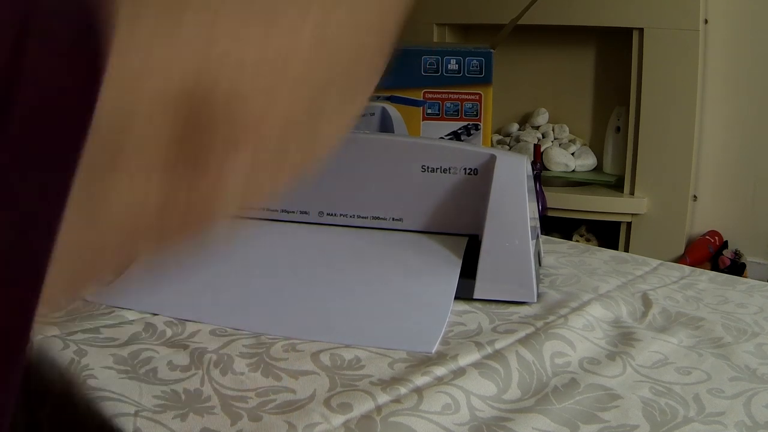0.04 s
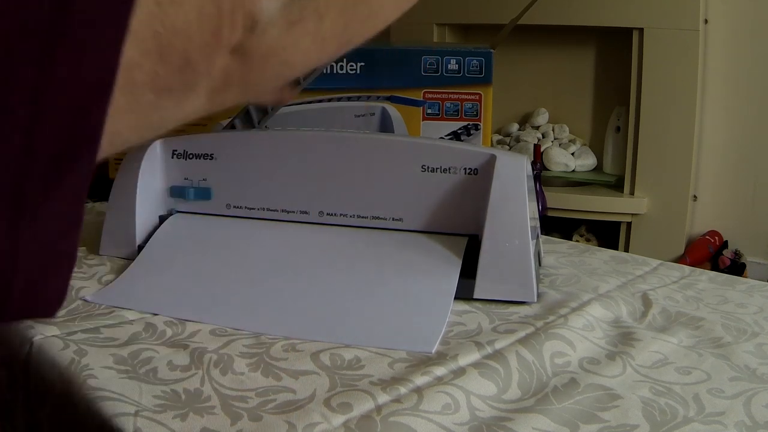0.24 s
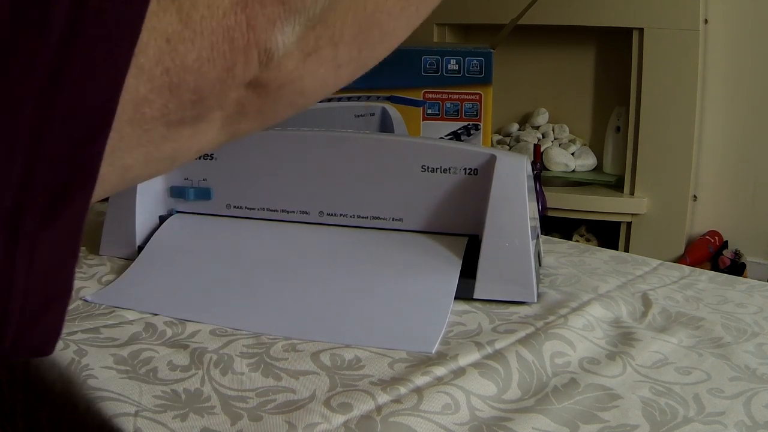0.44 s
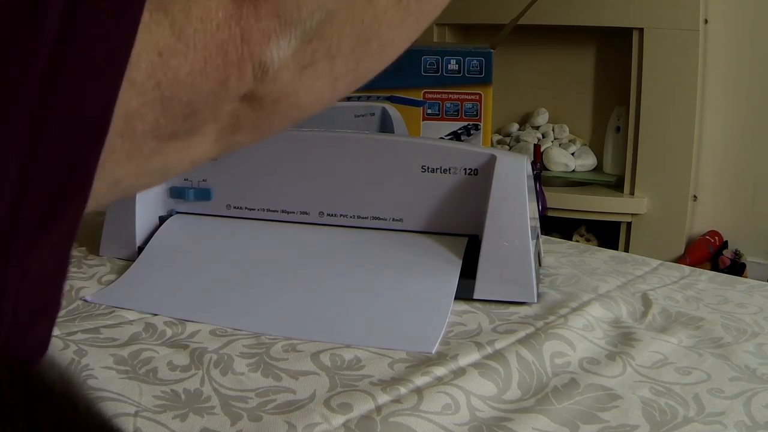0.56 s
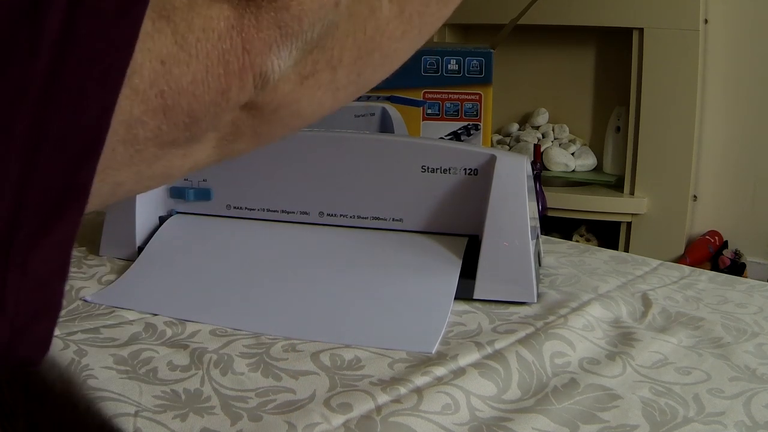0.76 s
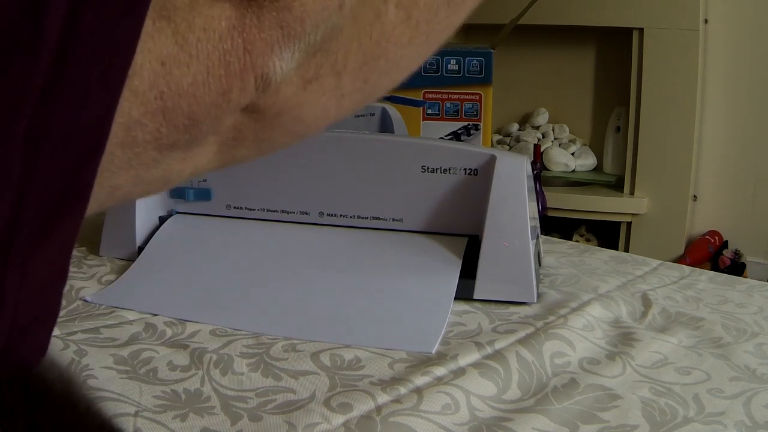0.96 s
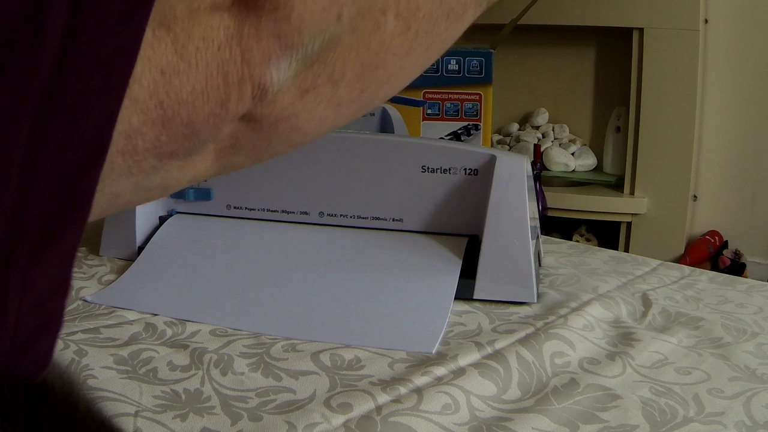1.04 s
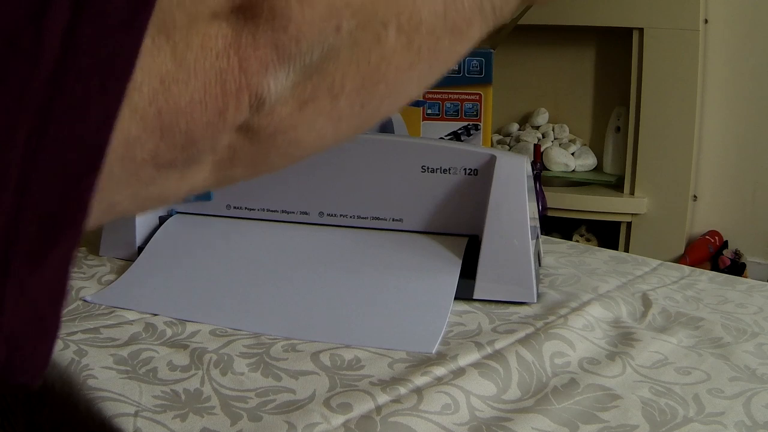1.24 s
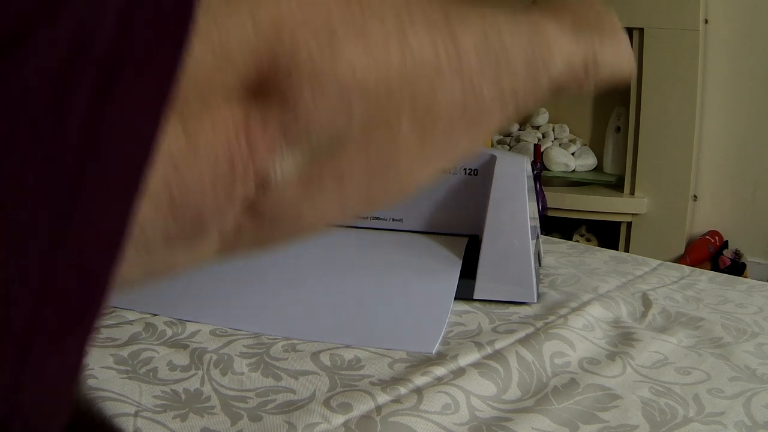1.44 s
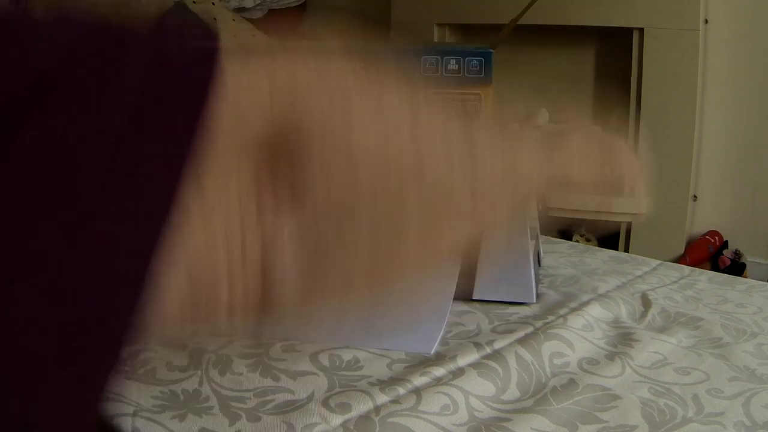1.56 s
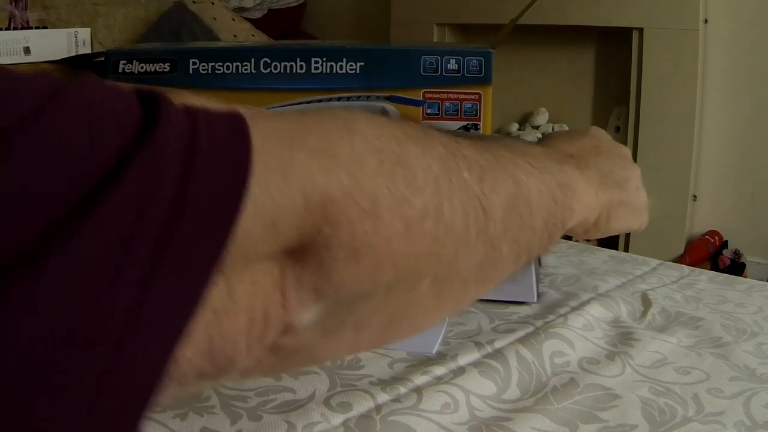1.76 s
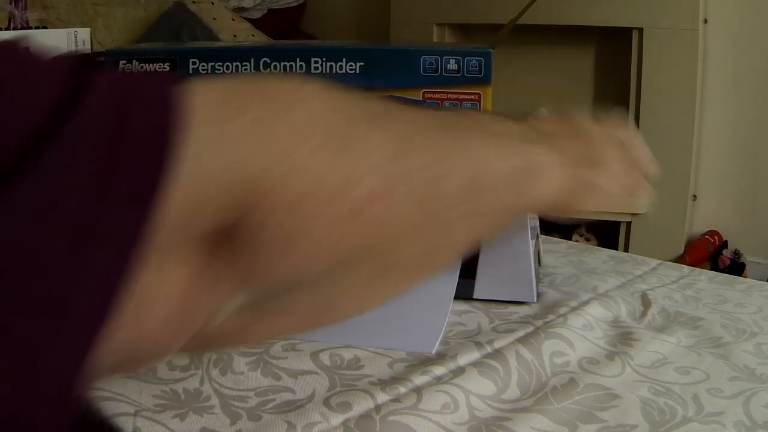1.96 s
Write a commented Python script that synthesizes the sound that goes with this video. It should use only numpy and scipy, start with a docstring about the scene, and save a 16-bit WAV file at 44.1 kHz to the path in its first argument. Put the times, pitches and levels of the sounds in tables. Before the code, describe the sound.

Paper-punching binder worked by hand: faint ticks, then a crunching run of plastic clunks and thunks.

```python
"""A plastic paper-punching binder is worked by its lever on a cloth-covered table in a small room.
The lever clunks into place and steel pins crunch through the sheets group after group: noise bursts
strike the modes of the case, over a bed of crackling grind. The linkage ticks under the grip before,
and the lever ticks back after, as short resonant puffs. A faint spring rings, the table sways in
deep sine swells, and a room tail and steady hiss surround it all."""
import sys
import numpy as np
from scipy import signal
from scipy.fft import rfft, irfft
from scipy.io import wavfile
from scipy.ndimage import uniform_filter1d

SR = 44100
rng = np.random.default_rng(int(sys.argv[2]) if len(sys.argv) > 2 else 0)


def put_to_file(sound):
    """Save the sound as 16-bit audio at rate SR, in the file named by the first command-line argument."""
    columns = np.atleast_2d(sound).T  # one column per channel
    safe = np.clip(columns, -1, 1)
    whole_steps = np.round(safe * 32767)
    wavfile.write(sys.argv[1], SR, whole_steps.astype(np.int16))


N = 88508  # samples in the scene


def amp(db):
    """Gain for a level in dB."""
    return 10 ** (np.asarray(db) / 20)


def to_rms_one(x):
    """Scale to an RMS of 1."""
    return x / np.sqrt(np.mean(x ** 2) + 1e-20)


def to_energy_one(x):
    """Scale so that the squared samples sum to 1."""
    return x / np.linalg.norm(x)


def read_curve(points, hz):
    """Read a curve of (Hz, value) points along a log frequency axis."""
    point_hz, value = np.transpose(points)
    return np.interp(np.log(hz + 1), np.log(point_hz + 1), value)


def add(mix, start, sound):
    """Lay a sound into the mix at a start in seconds, cut at the end of the mix."""
    part = mix[round(start * SR):][:len(sound)]
    part += sound[:len(part)]


def resonate(x, hz, width):
    """A resonance of gain 1: shift its pitch down to 0 Hz, smooth with one pole, shift back."""
    turn = np.exp(2j * np.pi * hz * np.arange(len(x)) / SR)
    pole = np.exp(-np.pi * width / SR)
    return 2 * (turn * signal.lfilter([1 - pole], [1, -pole], x / turn)).real


def split(x, hz, kind):
    """Keep the low or high side of a second-order crossover."""
    return signal.sosfilt(signal.butter(2, hz, kind, fs=SR, output="sos"), x)


def rattle(noise, t, length):
    """A dying noise burst whose broad spectrum is levelled, so that every blow drives all modes."""
    attack = np.minimum(t / 0.00057, 1)
    spectrum = rfft(noise * np.exp(-t / length) * attack)
    reach = max(int(t[-1] / length / 2), 1)  # smoothing width in spectrum bins
    broad_power = uniform_filter1d(abs(spectrum) ** 2, reach)
    levelled = irfft(spectrum / np.sqrt(broad_power), len(t))
    return levelled * np.exp(-t / (3 * length))


# Colour of the hiss. Each row: frequency in Hz, relative level in dB.
AIR_COLOUR = [(20, 6), (720, -19), (8080, -32.5), (15300, -43)]
AIR_DB = -58  # RMS level


def air():
    """Steady room and microphone hiss: noise shaped in the spectrum."""
    hz = np.fft.rfftfreq(N, 1 / SR)
    spectrum = rfft(rng.standard_normal(N)) * amp(read_curve(AIR_COLOUR, hz))
    return amp(AIR_DB) * to_rms_one(irfft(spectrum, N))


# How long the room holds each band. Each row: frequency in Hz, time to fall by 60 dB in seconds.
ROOM_DECAY = [(500, 0.19), (2000, 0.14), (6000, 0.21)]
ROOM_DB = -4  # gain of the room against the dry binder


def room(x):
    """Three noise tails fed in turn, each band dying at its own speed."""
    hz, t, noise = signal.stft(rng.standard_normal((3, SR // 2)), SR, nperseg=256)
    decay = amp(-60 * t / read_curve(ROOM_DECAY, hz)[:, None])
    tails = signal.istft(noise * decay, SR, nperseg=256)[1]
    tails = np.pad(tails, ((0, 0), (130, 0))) / np.linalg.norm(tails[0])  # 130 samples of pre-delay
    phase = np.pi * (23 * np.arange(N) / SR + np.arange(3)[:, None] / 3)
    feeds = x * np.sqrt(2 / 3) * np.cos(phase)  # the three squared weights always sum to 1
    return signal.fftconvolve(feeds, tails, axes=1)[:, :N].sum(0)


# The table rocks. Each row: start in seconds, RMS level at the crest in dB, rise in seconds.
TABLE_SWAYS = [(0.644, -49, 0.042), (0.968, -37, 0.032), (1.008, -34, 0.032), (1.16, -46, 0.028),
               (1.37, -34, 0.066), (1.627, -25.5, 0.011), (1.697, -20.5, 0.039), (1.859, -35, 0.028)]
SWAY_HZ = 38.5


def sway():
    """Each push rocks the table on its legs at a deep pitch: a smooth swell that dies away."""
    out, t = np.zeros(N), np.arange(SR // 2) / SR
    tone = np.sqrt(2) * np.sin(2 * np.pi * SWAY_HZ * t)
    for start, db, rise in TABLE_SWAYS:
        swell = (t / rise * np.exp(1 - t / rise)) ** 2  # reaches 1 at the rise time
        add(out, start, amp(db) * swell * tone)
    return out


# The return spring rings. Each row: start in seconds, level in dB before the swell and decay.
SPRING_RINGS = [(0.316, -48), (0.496, -47.5)]
SPRING_HZ, SPRING_T60 = 292, 0.43  # pitch, seconds to fall by 60 dB


def spring():
    """The return spring gives a faint pure ring that swells in and dies away."""
    out, t = np.zeros(N), np.arange(SR // 2) / SR
    tone = np.sin(2 * np.pi * SPRING_HZ * t) * np.minimum(t / 0.0062, 1)
    for start, db in SPRING_RINGS:
        add(out, start, tone * amp(db - 60 * t / SPRING_T60))
    return out


# Modes of the plastic case. Each row: frequency in Hz, width in Hz, relative energy in dB.
CASE_MODES = [(147.5, 24, 11), (220.6, 17.5, -2.5), (293, 66, 8), (356.5, 24, 11), (579, 75, -3.5),
              (697, 160, -19), (1230, 130, -8.5), (1422, 69, -9.5), (3020, 420, -12), (5500, 230, -65.5)]
# What the case radiates between its modes. Each row: frequency in Hz, relative level in dB per Hz.
CASE_BROAD = [(60, 3), (141, -22.5), (199, -19.5), (260, -1), (491, -9), (695, -5), (3400, -28),
              (4100, -30), (7000, -35.5), (15000, -58.5)]
BROAD_DB = 0.5  # broad colour against the modes


def case_response():
    """What the case rings with after one click: its modes plus a broad causal colour, energy 1."""
    log_gain = np.log(amp(read_curve(CASE_BROAD, abs(np.fft.fftfreq(8192, 1 / SR)))))
    minimum_phase = -signal.hilbert(log_gain).imag
    broad = np.fft.ifft(np.exp(log_gain + 1j * minimum_phase)).real[:4096]
    t = np.arange(len(broad)) / SR
    modes = np.zeros(len(t))
    for k, (hz, width, db) in enumerate(CASE_MODES):
        ring = np.sqrt(width) * np.exp(-np.pi * width * t) * np.sin(2 * np.pi * hz * t)
        modes += (-1) ** k * amp(db) * ring  # neighbours in opposite sign
    return to_rms_one(to_rms_one(modes) + amp(BROAD_DB) * to_rms_one(broad)) / np.sqrt(len(t))


CASE_LOW_HZ, BASS_HZ, TREBLE_HZ = 104, 197.6, 1584  # low cut, bass/middle and middle/treble crossovers


def voiced(drive, response):
    """A drive through the case, split in bass, middle and treble."""
    x = split(signal.fftconvolve(drive, response), CASE_LOW_HZ, "high")
    low = split(x, BASS_HZ, "low")
    mid = -split(split(x, BASS_HZ, "high"), TREBLE_HZ, "low")  # opposite sign: no gaps at the joins
    return low, mid, split(x, TREBLE_HZ, "high")


# Grinding of lever and pins, joined by straight lines.
# Each row: time in seconds, body RMS level in dB, treble against the body in dB.
GRIND_COURSE = [(0, -59.5, 4.5), (0.199, -68, -2.5), (0.328, -56.5, 4), (0.438, -66, -6.5),
                (0.598, -56.5, 2.5), (0.741, -61.5, 0.5), (0.791, -77.5, 0), (0.829, -56, 4.5),
                (0.898, -71, 6), (0.998, -33, -9.5), (1.129, -46.5, -2), (1.242, -66, -5), (1.27, -40, 0.5),
                (1.39, -35, 3.5), (1.5, -31, 4), (1.569, -34.5, 0), (1.649, -30.5, 3.5), (1.718, -33, -7.5),
                (1.84, -53, -4.5), (1.899, -48, -16.5), (1.95, -61.5, 3), (2.0, -55, 8.5)]
GRIND_BASS_DB = 9.5  # bass boost within the body
GRAINS_PER_S, GRAIN_SPREAD_DB, GRAIN_S = 500, 3.0, .002  # mean rate, size spread, decay in seconds


def grind(response):
    """Overlapping uneven crackles of tearing paper and rubbing parts, heard through the case."""
    t = np.arange(N) / SR
    time, db, treble_db = np.transpose(GRIND_COURSE)
    size = amp(GRAIN_SPREAD_DB * np.minimum(rng.exponential(1, N), 4))
    grains = size * (rng.random(N) < GRAINS_PER_S / SR)
    crackle = signal.lfilter([1], [1, -np.exp(-1 / (GRAIN_S * SR))], grains)
    rubbing = (0.38 + crackle) * rng.standard_normal(N)  # steady rub under the grains
    low, mid, high = voiced(rubbing, response)
    body = to_rms_one((amp(GRIND_BASS_DB) * low + mid)[:N])
    treble = to_rms_one(high[:N])
    return amp(np.interp(t, time, db)) * (body + amp(np.interp(t, time, treble_db)) * treble)


# Pitches in Hz at which the steel parts of the linkage ring.
LINKAGE_HZ = [1447, 1910, 2386, 3150, 3810, 5110, 6640]
LINKAGE_WIDTH, LINKAGE_DB = 160, 7  # Hz, gain of each ring
# Linkage ticks. Each row: start in seconds, energy of the pitched part in dB, pitch in Hz,
# bright band against the pitched part in dB.
LINKAGE_TICKS = [(0.051, -25.5, 2210, -7.5), (.258, -20, 2180, -8.5), (0.306, -17, 845, -7),
                 (.315, -24.5, 970, -7.5), (0.461, -23, 1830, -6.5), (.491, -16.5, 910, -47),
                 (.549, -22.5, 3030, -2), (0.594, -17.5, 1290, -7), (0.651, -24, 1230, -7.5),
                 (.712, -23, 1170, -9), (0.813, -14, 1840, -4.5), (.827, -24, 3640, -18),
                 (.843, -29, 3700, -16), (0.861, -30, 3740, -16), (.913, -18.5, 2140, -9),
                 (0.926, -13.5, 1500, -5.5), (1.111, -19, 1410, -3), (1.253, -21.5, 1580, 0),
                 (1.288, -7, 1880, -2.5), (1.943, -26.5, 1540, -6.5), (1.975, -21.5, 1430, -4.5)]
TICK_S, TICK_WIDTH = 0.0044, 1200  # burst decay in seconds, width of the pitch in Hz
TICK_HIGH_HZ, TICK_HIGH_WIDTH = 4440, 2200  # bright band in Hz


def ticks():
    """Each slip of the linkage is a sharp puff at a broad pitch plus a bright band; steel rings along."""
    out, t = np.zeros(N), np.arange(SR // 20) / SR
    for start, db, hz, treble_db in LINKAGE_TICKS:
        puff = rattle(rng.standard_normal(len(t)), t, TICK_S)
        steel = sum(resonate(puff, f, LINKAGE_WIDTH) for f in LINKAGE_HZ)
        puff = puff + amp(LINKAGE_DB) * steel
        pitched = resonate(resonate(puff, hz, TICK_WIDTH), hz, TICK_WIDTH)
        bright = resonate(puff, TICK_HIGH_HZ, TICK_HIGH_WIDTH)
        bright = split(resonate(bright, TICK_HIGH_HZ, TICK_HIGH_WIDTH), hz, "high")
        tick = to_energy_one(pitched) + amp(treble_db) * to_energy_one(bright)
        add(out, start, amp(db) * tick)
    return out


# Knocks of lever and pins in the case. Each row: start in seconds, energy of the middle in dB,
# bass and treble against the middle in dB, burst decay in seconds.
CASE_KNOCKS = [(.952, -3.5, -14, -11.5, 0.0054), (0.979, -3.5, -7.5, -8.5, 0.016),
               (1.038, -11.5, 5, -3, 0.011), (1.049, -0.5, -12, -10, 0.019), (1.258, -13, 2, -14, 0.0043),
               (1.268, -4.5, -7.5, -4, 0.0079), (1.311, 1, -30, -3.5, 0.0062), (1.36, 3, 3, -6.5, 0.007),
               (1.407, -1.5, 2, -11.5, 0.0051), (1.431, 1, 3, -10, 0.003), (1.438, 4.5, -20, -18, 0.0073),
               (1.463, 8.5, -14, -15, 0.0011), (1.473, 8, -1, -21, 0.014), (1.49, -1.5, -1, -8, 0.0041),
               (1.504, 4, -0.5, -11, 0.007), (1.526, -1, 2, -4, 0.0117), (1.587, 3.5, -1, -25, 0.0033),
               (1.609, 13, -9.5, -11.5, 0.018), (1.623, -4.5, -20, -6.5, 0.0017),
               (1.631, 9, -4, -7.5, 0.0065), (1.675, 5, -2.5, -7, 0.0072),
               (1.737, 2.5, -6.5, -12.5, 0.0054)]
COLOUR_HZ, COLOUR_WIDTH, COLOUR_DB = (1775, 5500), 400, 8.5  # pitch range in Hz, width in Hz, gain


def knocks(response):
    """Short rattles drive the case, each coloured by a resonance at a random treble pitch."""
    out, t = np.zeros(N), np.arange(SR // 10) / SR
    for start, db, bass_db, treble_db, length in CASE_KNOCKS:
        drive = rattle(rng.standard_normal(len(t)), t, length)
        colour_hz = np.exp(rng.uniform(*np.log(COLOUR_HZ)))
        drive = drive + amp(COLOUR_DB) * resonate(drive, colour_hz, COLOUR_WIDTH)
        low, mid, high = [to_energy_one(band) for band in voiced(drive, response)]
        add(out, start, amp(db) * (mid + amp(bass_db) * low + amp(treble_db) * high))
    return out


def scene():
    """The binder dry and through the room, with the spring, the table and the air."""
    response = case_response()
    binder = ticks() + knocks(response) + grind(response)
    return (binder + amp(ROOM_DB) * room(binder) + spring() + sway() + air())[None]


def record(dry):
    """A steep low-pass takes away the top of the treble."""
    low_pass = signal.firwin(511, 15350, window=("kaiser", 9), fs=SR)  # edge in Hz
    return signal.oaconvolve(dry, low_pass[None], "same")


dry = scene()
out = record(dry)
put_to_file(out)
```